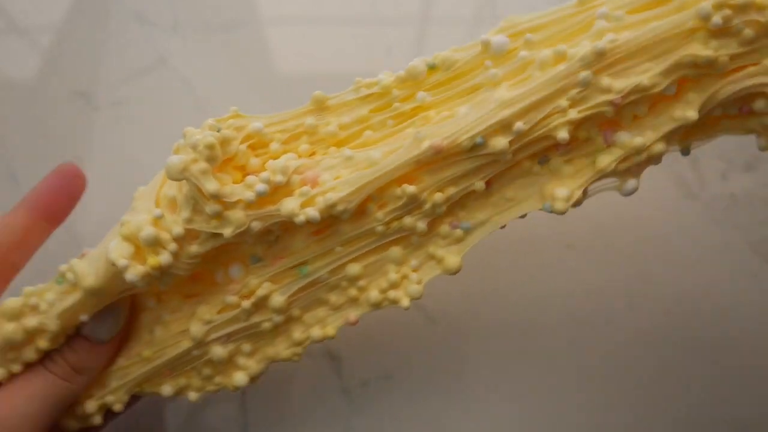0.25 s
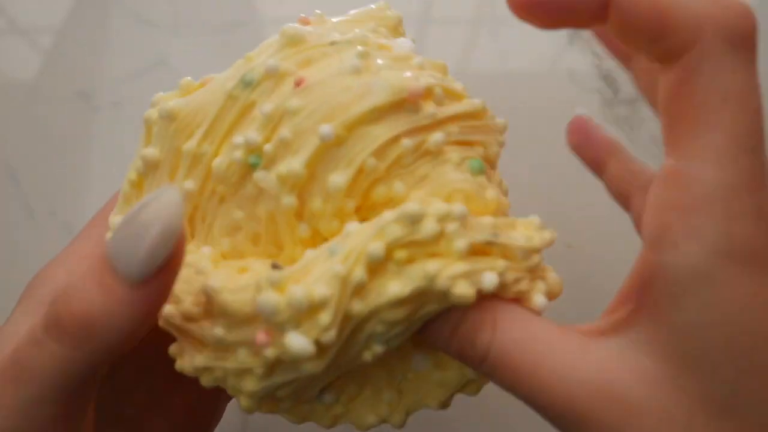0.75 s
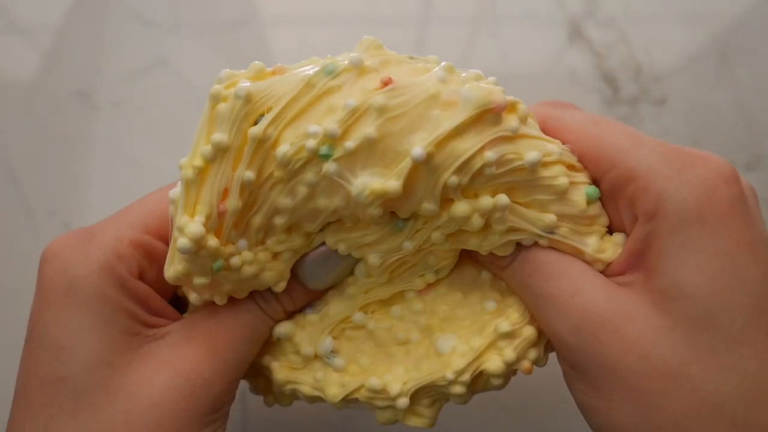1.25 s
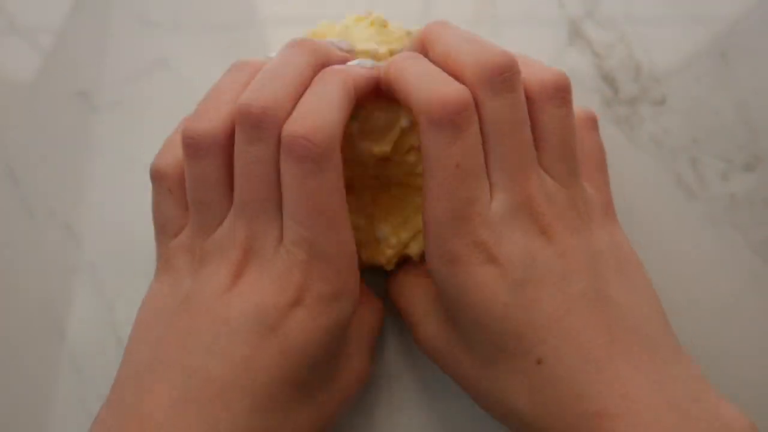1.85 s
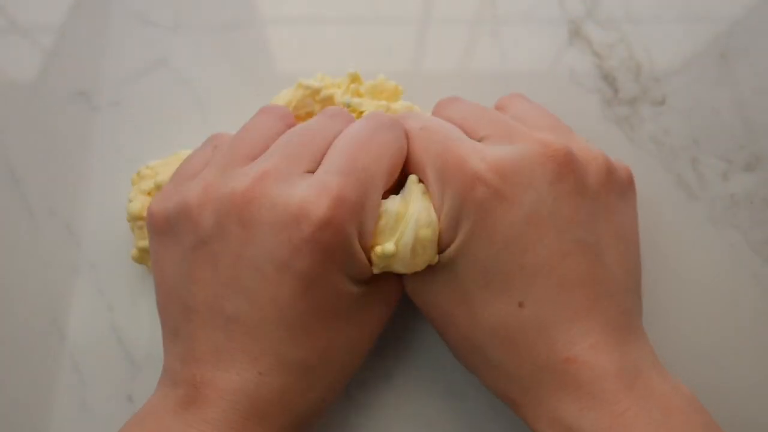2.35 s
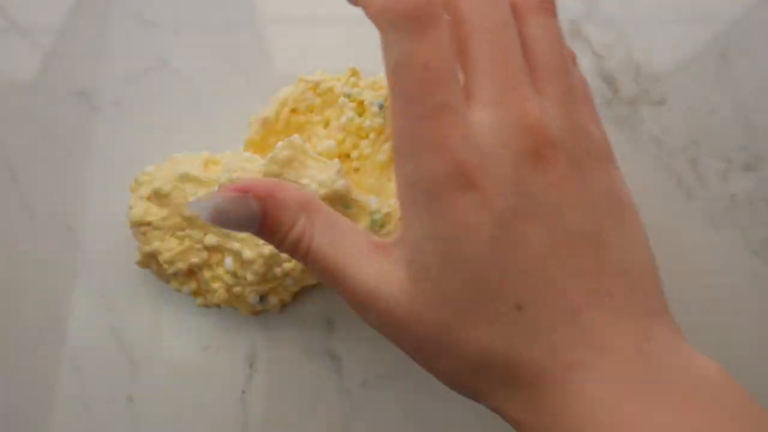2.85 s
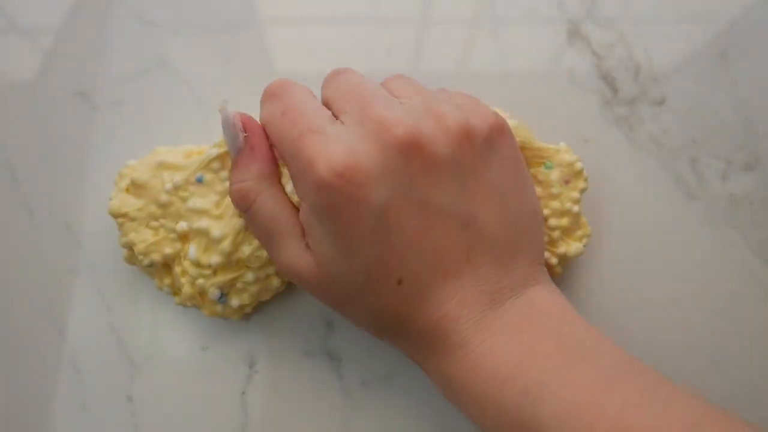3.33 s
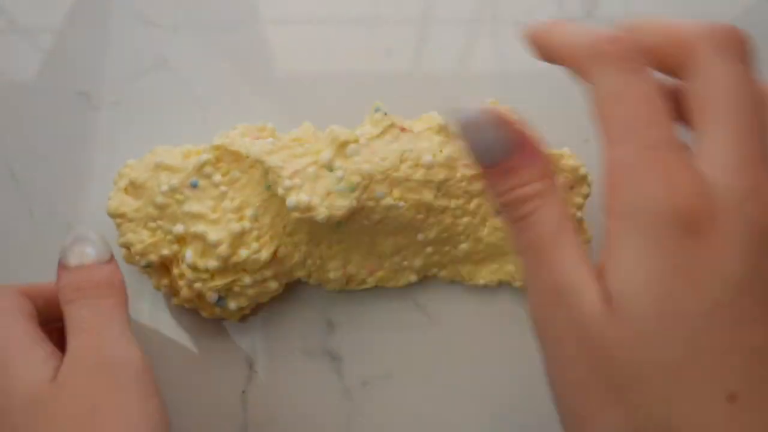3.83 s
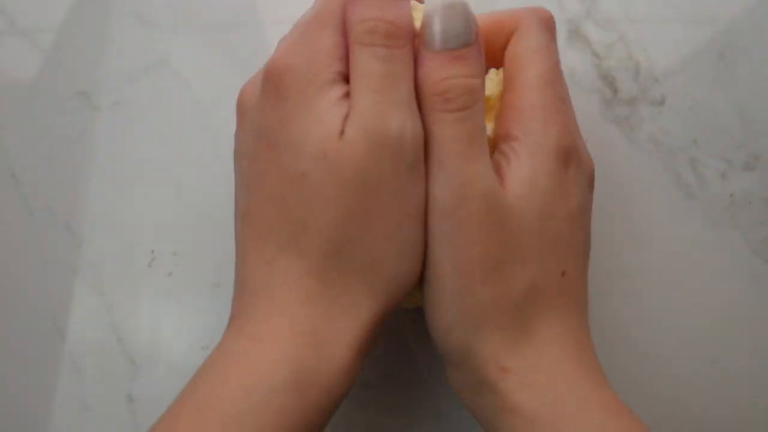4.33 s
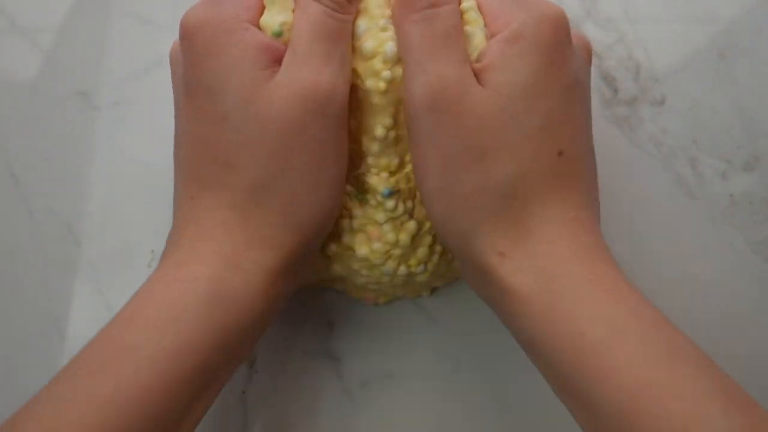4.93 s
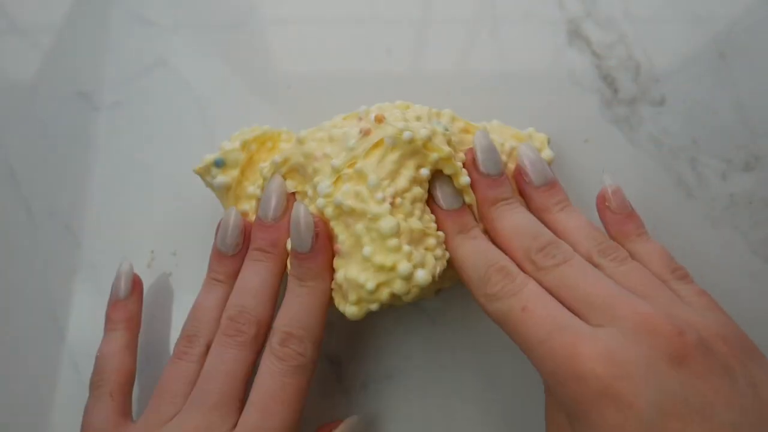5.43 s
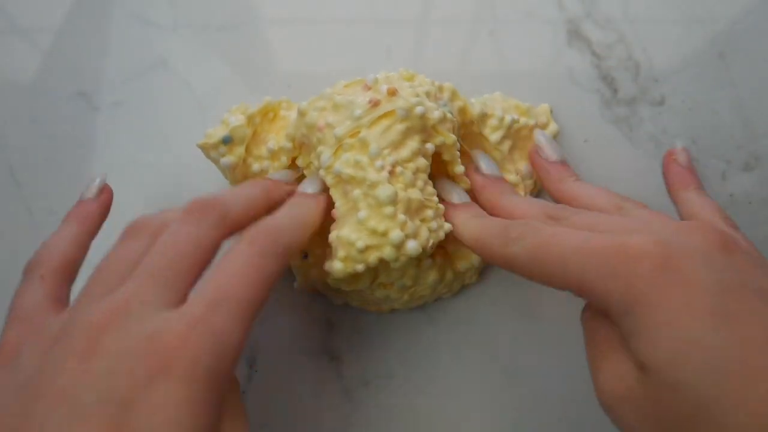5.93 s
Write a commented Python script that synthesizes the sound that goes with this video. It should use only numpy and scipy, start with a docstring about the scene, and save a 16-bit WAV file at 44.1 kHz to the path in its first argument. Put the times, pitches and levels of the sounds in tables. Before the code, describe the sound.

Hands squeeze and knead a sticky bead-filled slime, giving dense irregular crackling, sharp wet pops and faint soft thuds on a hard counter.

```python
"""Kneading bead-filled slime

Hands knead a bead-filled slime on a hard counter, close to a stereo microphone in a small bright room.
Big trapped air pockets burst as single pops: short decaying tones with a snap, a hollow and a fizz.
Countless small ones crackle with each squeeze: random grains of many pitches, gathered in flurries.
Air squirts briefly as whistling hiss; the counter booms and rings faintly, mostly as resonant noise.
A quiet room tone of coloured noise, with a low wavering hum, lies beneath; sparse echoes add the room."""
import sys
import numpy as np
from scipy import signal
from scipy.fft import rfft, irfft
from scipy.io import wavfile

SR = 44100
rng = np.random.default_rng(int(sys.argv[2]) if len(sys.argv) > 2 else 0)


def unload_wav(signal):
    """Save mono or channel-first audio to the path in sys.argv[1] as 16-bit WAV at rate SR, clipped to [-1, 1]."""
    wavfile.write(
        sys.argv[1],
        SR,
        np.round(np.clip(np.atleast_2d(signal).T, -1, 1) * 32767).astype(np.int16),
    )


N = 272538  # samples
STEP = 64  # samples between two values of a slow level curve

# single bursting pockets, before pops() trims the layers and filters out the bass:
# [t/s, level/dB, f/Hz, snap of the tearing film over the pop/dB, hollow behind the pocket over the pop/dB]
POPS = [(0.034, -23.5, 6770, -14, -18), (0.061, -27.5, 1900, -12, -28), (0.12, -21.5, 3460, 3, -11),
        (0.165, -29, 9260, -2, -15), (0.194, -27.5, 3100, 4, -27), (0.387, -25.5, 2510, -15, -31),
        (0.407, -18.5, 10600, -1, -1), (0.488, -30.5, 1810, 9.5, -29), (0.517, -33, 2270, -11, -21),
        (0.538, -25.5, 5840, -16, 0), (0.572, -20, 8300, -11, -15), (0.6, -29, 3200, -10, -10),
        (0.68, -24.5, 3830, -10, 4), (0.69, -29.5, 2650, -17, -23), (0.715, -24, 2480, 7, -15),
        (0.759, -34, 1450, 8, -20), (0.8613, -27, 2300, -6, -27), (0.925, -29.5, 1900, -30, -32),
        (0.971, -23, 1775, -13, -34), (1.031, -22.5, 2130, -23, -24), (1.063, -28.5, 2200, -15, 2),
        (1.11, -29, 2080, -5, -36), (1.123, -26.5, 3530, -10, -16), (1.155, -9.5, 6600, -2, 2.5),
        (1.201, -42, 5040, -4, -16), (1.212, -38, 2240, -15, -27), (1.227, -28.5, 7100, -6, -8),
        (1.283, -1.5, 4740, -15, -40), (1.288, -12, 3030, -23, -41), (1.322, -19.5, 3020, -17, -20),
        (1.459, -34, 2710, -27, -21), (1.551, -19, 2290, -20, -14), (1.641, -24.5, 3680, -12, -1),
        (1.862, -30, 3760, 8, -10), (1.882, -28.5, 1860, -14, -7), (1.906, -27.5, 9000, 9, -12),
        (1.921, -17.5, 10800, -4, -17), (1.949, -24.5, 2520, 12, 5), (1.977, -15.5, 1210, -24, -27),
        (2.006, -36, 5510, -12, -14), (2.012, -28.5, 4840, 17, -22), (2.07, -32, 2200, -8, -27),
        (2.08, -11.5, 7000, 3, -20), (2.088, -18.5, 1390, -18, -22), (2.1045, -11.5, 10070, 6, 4.5),
        (2.123, -18, 1490, -10, -25), (2.127, -6.5, 10600, 4.5, -6), (2.138, -13.5, 4660, -7, -7),
        (2.157, -31, 10160, -6, -17), (2.174, -8.5, 9930, 0, -5), (2.188, -9, 4180, -17, -1.5),
        (2.208, -18, 1250, -9, -9.5), (2.2202, -12, 5120, 3, -14), (2.23, -13, 5100, 2, -12),
        (2.276, 3, 11570, -4, -9), (2.308, -9, 9300, -5, -12), (2.318, 2.5, 8530, 1, -25),
        (2.333, -1.5, 9900, -1, 5), (2.349, -12, 3050, -11, -12), (2.362, -5.5, 3780, -16, -30),
        (2.379, -11, 4740, -2, -1.5), (2.405, -15.5, 6460, 6, -7), (2.413, -9, 7100, -27, -19),
        (2.448, -18, 2970, -13.5, -2), (2.463, -5.5, 2930, -30, 0), (2.61, -20.5, 1000, -8, -45),
        (2.664, -31, 920, -15, -20), (2.677, -30.5, 1150, -13, -20), (2.711, -20.5, 2190, -15, -13),
        (2.989, -29.5, 1870, -15, -10), (3.003, -16.5, 11300, -7, -16), (3.015, -9, 4080, 2.5, 0),
        (3.055, -16, 2440, -8, -0.5), (3.106, -21, 4440, -17, -14), (3.132, -15, 3710, 5, 7.5),
        (3.142, -19.5, 5900, 3, -15), (3.2, -26, 3000, 16.5, -23), (3.235, -16.5, 3980, 0, -15),
        (3.244, -8, 1840, -3, -45), (3.276, -20.5, 5640, -16, -12), (3.31, -31, 2290, -10, -20),
        (3.353, -15.5, 6420, -6, -4), (3.373, -11, 2510, -8, -14), (3.381, -26.5, 2520, -12, -27),
        (3.422, -1.5, 10530, 0.5, -26), (3.43, -30.5, 9390, -5, -20), (3.456, -1, 10530, -25, -4),
        (3.477, -8.5, 7100, 2, -16), (3.497, -16, 2470, -15, -31), (3.53, -14, 4300, -21, -1),
        (3.543, -8.5, 4000, -27, -38), (3.548, -24.5, 5540, -29, -4), (3.575, -3, 2990, -38, -34),
        (3.693, -30.5, 9200, 14, -12), (3.713, -27, 2400, -15, -3), (3.747, -24.5, 1600, -15, 6),
        (3.76, -22.5, 1690, -14, 3), (3.787, -28, 710, -15, -17), (3.795, -24.5, 1700, 4, -20),
        (3.807, -24, 1550, -15, 5), (3.82, -27.5, 645, -20, -25), (3.989, -37.5, 8960, 1, -15),
        (4.012, -29.5, 745, -10, -19), (4.074, -16, 3960, -13, -16), (4.102, -15.5, 3760, 3, -2),
        (4.158, -14, 6380, -8, -19), (4.167, -22, 3000, -9, 1), (4.236, -25, 2030, 7, 1.5),
        (4.26, -12.5, 8150, 3, -7), (4.302, -27, 1785, 8, -6), (4.335, -14.5, 10800, -22, -14),
        (4.342, -23, 2380, -14, -10), (4.366, -24, 4150, -10, -16), (4.374, -19, 9780, 0, -13),
        (4.396, -18, 5670, 1, -4), (4.445, -29.5, 2750, -18, -20), (4.467, -17, 6840, 0, -4),
        (4.487, -18, 5400, -5, -23), (4.491, -11, 12520, -16, -13), (4.529, -11, 6480, 2, -12),
        (4.564, -8, 8240, -21, -14), (4.569, -5.5, 3640, 1.5, -37), (4.596, -5.5, 6160, -24, -33),
        (4.613, -3, 6100, -16, -29), (4.623, -2.5, 6480, -21, -28), (4.633, -17, 4600, 10, -22),
        (4.685, -21.5, 11500, 6, -12), (4.705, -13.5, 6070, 8, -29), (4.724, -27, 9860, 7, -16),
        (4.755, 2.5, 12400, -38, -6), (4.758, -26, 11800, -6, -12), (4.781, -4, 11500, 2, -27),
        (4.81, -8.5, 10840, 1, -20), (4.851, -19, 10300, -5, -21), (4.866, -23, 1320, -9, -8),
        (4.882, -11.5, 10300, -3, -20), (4.894, -19, 9900, 10.5, -14), (4.982, -32.5, 6000, 7, -15),
        (5.067, -18, 10000, 2, -19), (5.101, -21, 5650, -17, -19), (5.219, -21.5, 6960, 2, -22),
        (5.287, -22, 4600, 0.5, -25), (5.302, -19, 5310, 5, -23), (5.346, -19.5, 4820, -11, -31),
        (5.435, -10.5, 11700, -41, -8), (5.497, -31.5, 3090, 7, 5), (5.523, -34, 3300, -10, -10),
        (5.542, -33, 2280, -10, -15), (5.542, -38.5, 634, -20, -25), (5.551, -41.5, 900, -15, -20),
        (5.577, -24, 4380, -18, -12), (5.611, -36, 1380, -18, 6), (5.577, -43, 900, -20, -25),
        (5.63, -20.5, 3350, 8, -5), (5.63, -35.5, 640, -20, -25), (5.659, -35.5, 695, -8, -20),
        (5.666, -30.5, 3500, -10, -8), (5.682, -15, 3710, 8.5, -6.5), (5.692, -36, 3600, -10, -10),
        (5.707, -35.5, 745, -10, -16), (5.752, -20.5, 6570, -18, -23), (5.913, -24, 5550, -11, -18),
        (5.969, -23, 6150, -13, -14), (5.978, -35.5, 545, -8, -17), (6.002, -26.5, 3640, -9, -21),
        (6.02, -35, 650, -7, -9)]
# a pop's film goes on fizzing, as added crackle: [f of the pop/Hz, fizz level over the pop/dB]
FIZZ = [(1200, -15.5), (3000, -21.5), (6000, -32), (11000, -42)]
FIZZ_FALL_DB_PER_S, FIZZ_LARGE_DB, FIZZ_TINY_DB = 257.5, -13.5, -11
# hand moves (stretch, fold, squeeze, peel), before the trim in crackle(); pitch decides how much of the
# last two columns a pocket takes: [t/s, length/s, crackle level at start/dB, crackle level at end/dB,
# weight of large pockets/dB, weight of tiny pockets/dB]
MOVES = [(0, 0.14, -39.5, -48.5, -3, 2.5), (0.163, 0.076, -45, -45.5, -5.5, -2),
         (0.252, 0.066, -57, -48, 0.5, -0.5), (0.348, 0.1, -39, -48, 2, 2),
         (0.507, 0.094, -58, -35.5, -4.5, -1.5), (0.622, 0.09, -48.5, -40.5, -4.5, 3),
         (0.781, 0.027, -35, -47.5, 6, -1.5), (0.854, 0.18, -49.5, -63.5, -9.5, -8.5),
         (1.028, .055, -35, -42, -0.5, -4), (1.107, .15, -43, -47, 3.5, 3),
         (1.352, 0.22, -48, -59.5, -1, -1.5), (1.532, 0.18, -39, -42.5, 10.5, 1),
         (1.83, 0.11, -52, -41.5, 4, 4), (1.964, 0.18, -33, -43.5, 2, 1),
         (2.068, 0.18, -35.5, -33, 6.5, 3.5), (2.271, 0.21, -26.5, -42, -6.5, 1.5),
         (2.539, 0.043, -48.5, -36.5, 12.5, -4), (2.598, .11, -32.5, -33.5, 9, 1.5),
         (3.01, 0.11, -34, -40, 1.5, 4), (3.146, 0.21, -36, -41.5, -2.5, 2.5),
         (3.247, 0.19, -27.5, -39, -7, -3), (3.422, 0.094, -31.5, -40, 1, 8),
         (3.677, 0.13, -40, -32.5, 13, 2.5), (3.822, 0.075, -48, -40, -1.5, -4.5),
         (4.034, 0.021, -27.5, -41, 4.5, 1), (4.074, 0.14, -37.5, -40, 5, 7),
         (4.251, 0.18, -49.5, -40.5, 6.5, 5), (4.482, 0.14, -41, -30.5, 1.5, 8),
         (4.664, 0.16, -38, -43, -5.5, 9), (4.809, 0.12, -47.5, -46.5, -0.5, 5),
         (4.938, 0.028, -59, -50.5, -2, 0.5), (4.995, 0.2, -41.5, -38.5, 3.5, 2.5),
         (5.188, 0.2, -44.5, -47.5, -0.5, 9), (5.439, 0.24, -47.5, -58.5, -0.5, 6),
         (5.624, .04, -45, -52.5, 6, 5.5), (5.697, 0.12, -42, -57.5, 3.5, 11.5),
         (5.915, 0.036, -46.5, -56.5, -3, 0.5), (5.946, 0.059, -47, -42, 7.5, 9)]
MOVE_RISE_DB_PER_S, MOVE_FALL_DB_PER_S = 1201, 325
# colour of the crackle, pockets of all sizes: [f/Hz, relative level/dB per Hz]
CRACKLE_COLOUR = [(150, -47), (250, 24), (358, -7), (801, -9.5), (904, -4), (1860, -3), (3320, -4),
                  (7960, -4), (10100, 0), (15000, -21)]
# large pockets vary less in strength and join the flurries less: [f/Hz, share of both effects]
CLUMPING = [(600, .45), (2000, 1.0)]

# the lump pushed against or pulled off the slab:
# [t/s, length/s, boom level/dB, drive level of the upper modes/dB]
PUSHES = [(0.098, 0.13, -70, -88), (.66, 0.081, -61, -67), (1.1, 0.082, -71, -76),
          (1.566, 0.094, -61.5, -59), (1.93, 0.088, -63, -65), (2.113, 0.056, -59, -49.5),
          (2.236, 0.26, -69, -55.5), (2.63, 0.092, -52, -47), (3.044, 0.061, -61, -53.5),
          (3.135, 0.17, -62, -53.5), (3.37, 0.21, -75, -58), (3.683, 0.15, -62, -52),
          (3.843, 0.068, -45, -56), (4.035, 0.018, -75, -50.5), (4.08, 0.11, -59.5, -52.5),
          (4.294, 0.35, -70, -59.5), (4.612, 0.26, -102.5, -57.5), (4.872, 0.081, -63, -65),
          (4.988, 0.225, -59.5, -60), (5.285, 0.078, -70, -63), (5.528, 0.25, -64.5, -61.5),
          (5.964, 0.063, -54, -52)]
BOOM_RISE_DB_PER_S, BOOM_FALL_DB_PER_S, BOOM_REST_DB = 172, 293, -81
RING_RISE_DB_PER_S, RING_FALL_DB_PER_S, RING_REST_DB = 502.5, 348, -86
BOOM_HZ, BOOM_WIDTH_HZ = 128, 28  # width of each of two filter passes
# ringing modes of the slab: [f/Hz, width of each of two filter passes/Hz, level over the drive/dB]
UPPER_MODES = [(678, 99, 0.5), (1210, 64, -10), (410, 280, -4), (263, 200, -8)]

# short hisses of squirting air, partly whistling; the two long faint rows near 5 s are the slab's modes
# ringing: [t/s, length/s, hiss level/dB, whistle or mode f/Hz, level of that pitch over the hiss/dB]
PITCHED_HISSES = [(4.016, 0.016, -21.5, 7500, -11.5), (4.033, 0.014, -33.5, 4100, 1.5),
                  (4.999, 0.125, -59.5, 700, 8), (5.085, 0.115, -59, 1260, 9),
                  (2.221, 0.02, -30.5, 4940, 5), (3.836, 0.016, -42, 4030, 2.5),
                  (5.914, 0.0081, -38.5, 2900, -11), (1.565, 0.014, -34.5, 2150, -5)]

# colour of the room tone: [f/Hz, relative level/dB per Hz]
TONE_COLOUR = [(24, -40), (40, -13.5), (143, -6), (197, -9), (280, -3.5), (397, -12.5), (496, -8.5),
               (548, -36), (606, -12.5), (797, -16), (1100, -15.5), (3000, -26), (9000, -30.5),
               (13000, -23), (15500, -39.5)]
TONE_DB = -58
HUM_HZ, HUM_WIDTH_HZ, HUM_DB = 59, 6.1, -70  # width of each filter pass; level before the channel balance

# decay of the echoes: [f/Hz, time to fall by 60 dB/s]
ROOM_DECAY = [(400, 0.026), (1500, 0.26), (4000, 0.21), (12000, 0.21)]
# colour of the microphone: [f/Hz, level/dB]
MIC_COLOUR = [(6800, 1), (7900, -2), (8800, -0.5), (14500, -9), (15400, -9.5), (15900, -23), (16600, -35.5)]
EDGE_HZ = 16600  # band limit


def gain_of(db):
    """Decibels to a factor."""
    return 10 ** (np.asarray(db) / 20)


def evened(x):
    """Scales to rms 1."""
    return x / np.sqrt(np.mean(x ** 2) + 1e-20)


def read(points, hz):
    """Reads (Hz, value) points on a log-frequency axis."""
    f, value = np.transpose(points)
    return np.interp(np.log(hz + 1), np.log(f + 1), value)


def add(mix, s, sound):
    """Mixes a two-channel sound in at second s."""
    part = mix[:, max(round(s * SR), 0):][:, :sound.shape[1]]
    part += sound[:, :part.shape[1]]


def high_passed(x, hz):
    """Takes out the bass, which tiny sources hardly stir."""
    return signal.lfilter(*signal.butter(2, hz, "high", fs=SR), x)


def swells(start, length, first_db, last_db, rise, fall):
    """Power of each move over time: a rise, a straight drift in dB while it lasts, a fall."""
    t = np.arange(0, N + STEP, STEP)[:, None] / SR
    drift_db = first_db + (last_db - first_db) * np.clip((t - start) / length, 0, 1)
    rise_db = rise * np.maximum(start - t, 0)
    fall_db = fall * np.maximum(t - start - length, 0)
    return gain_of(2 * (drift_db - rise_db - fall_db))  # doubled dB give power


def spread_out(x):
    """From one value per step to every sample."""
    return np.interp(np.arange(N), STEP * np.arange(len(x)), x)


def narrow_noise(hz, width):
    """Two partly alike channels of noise through one resonance twice, stronger on the left; rms 1."""
    a, b = rng.standard_normal((2, N))
    radius = np.exp(-np.pi * width / SR)
    poles = [1, -2 * radius * np.cos(2 * np.pi * hz / SR), radius ** 2]
    pair = np.array([a, 0.25 * a + 0.6 * b])
    once = signal.lfilter([1, 0, -1], poles, pair)
    return evened(signal.lfilter([1], poles, once))


def burst(hz, cycles, glide, onset=2.78):
    """Air in an opened pocket swings a few times, its pitch first rising as the hole widens; peak 1."""
    turns = np.arange(600) / SR * min(hz, SR / 3)
    fade = turns / max(cycles, 0.3)
    swing = np.sin(2 * np.pi * turns * (1 + glide * np.minimum(fade, 2)))
    wave = swing * np.exp(-fade) * (1 - np.exp(-onset * turns)) ** 2
    return wave / abs(wave).max()


def room_tone():
    """Steady coloured noise, nearly unrelated left and right, and a wavering hum."""
    hz = np.fft.rfftfreq(N, 1 / SR)
    a, b = rng.standard_normal((2, N))
    noise = irfft(rfft(np.array([a, 0.029 * a + b])) * gain_of(read(TONE_COLOUR, hz)), N)
    steady = np.sin(2 * np.pi * HUM_HZ * np.arange(N) / SR) * gain_of([[4], [0]])  # stronger on the left
    hum = steady + 0.56 * narrow_noise(HUM_HZ, HUM_WIDTH_HZ)
    return gain_of(TONE_DB) * evened(noise) + gain_of(HUM_DB) * hum


def kneading():
    """Crackle level and the weights of large and tiny pockets, from all moves and the fizz after each pop."""
    start, length, first_db, last_db, large_db, tiny_db = np.transpose(MOVES)
    moves = swells(start, length, first_db, last_db, MOVE_RISE_DB_PER_S, MOVE_FALL_DB_PER_S)
    s, db, hz = np.transpose(POPS)[:3]
    fizz_db = db + read(FIZZ, hz)
    fizz = swells(s, 0.0023, fizz_db, fizz_db, 5000, FIZZ_FALL_DB_PER_S).sum(1)
    power = moves.sum(1) + fizz + 1e-9
    large = (moves @ large_db + fizz * FIZZ_LARGE_DB) / power
    tiny = (moves @ tiny_db + fizz * FIZZ_TINY_DB) / power
    return spread_out(10 * np.log10(power)), spread_out(large), spread_out(tiny)


def flurry_gain(level_db, large_db):
    """One burst sets off its neighbours: flurries that start at once and die away; rms 1."""
    starts = gain_of(2.5 * np.minimum(rng.exponential(1, N), 2.2)) * (rng.random(N) < 25 / SR)
    pop_s, pop_db = np.transpose(POPS)[:2]
    at = (pop_s * SR).astype(int)
    starts[at] += gain_of(0.15 * (pop_db - level_db[at]))  # the bigger the pop, the bigger its flurry
    flurries = signal.lfilter([1], [1, -np.exp(-1 / (0.0073 * SR))], starts)  # 7.3 ms decay constant
    return evened(1.04 + flurries * gain_of(-0.4 * large_db))  # wet, soft folds crackle more evenly


def crackle(per_s=300, spread_db=3.7, count=30):
    """Pockets of many sizes burst at random in clumps; a few are much louder than the rest."""
    level_db, large_db, tiny_db = kneading()
    clumps = flurry_gain(level_db, large_db)
    spots, clump_power = np.zeros((3, 2, N)), np.mean(clumps ** 2)
    for k, hz in enumerate(np.geomspace(350, 13500, count)):
        share = read(CLUMPING, hz)
        strength = gain_of(spread_db * share * np.minimum(rng.exponential(1, N), 2.8))
        sizes = strength * rng.choice([-1, 1], N)
        sizes *= rng.random(N) < per_s * (hz / 3000) ** 0.3 / SR  # small pockets are more numerous
        place_db = 8 * rng.uniform(-0.98, 1, N)  # left over right
        train = sizes * gain_of([place_db / 2, -place_db / 2])
        grains = evened(signal.oaconvolve(train, burst(hz, 1.27, 0.1)[None], axes=1)[:, :N])
        size_db = large_db * read([(900, 0.66), (2500, 0.04)], hz)
        size_db += tiny_db * read([(4500, 0.22), (9000, 1.0)], hz)
        colour = np.sqrt(hz) * gain_of(read(CRACKLE_COLOUR, hz) + size_db)  # higher bands are wider
        spots[k % len(spots)] += grains * colour * clumps ** share
    return evened(spots) * np.sqrt(clump_power) * gain_of(level_db - 4)


def pops(count=3):
    """Each pocket rings at its own pitch, with a bright snap and a lower hollow; they burst at a few spots."""
    spots, chance = np.zeros((count, 2, N)), rng.random((len(POPS), 4))
    for k, (s, db, hz, snap_db, hollow_db) in enumerate(POPS):
        sign, glide, snap, place = chance[k]
        # the smallest pockets ring for the most cycles
        cycles = read([(700, 0.65), (2000, 0.92), (5000, 0.67), (10000, 2.13)], hz)
        wave = burst(hz, cycles, 0.03 * glide, onset=5)
        wave += gain_of(snap_db - 2.5) * burst(9500 + 2500 * snap, 2.0, 0)
        wave += gain_of(snap_db - 10.0) * burst(5800, 0.67, 0, onset=5.2)  # lower part of the snap
        wave += gain_of(hollow_db - 11.0) * burst(0.47 * hz, 1.0, 0, onset=5.5)
        wave += gain_of(-27.0) * burst(1180, 0.99, 0)  # faint knock of fixed pitch
        wave += gain_of(-34) * burst(710, 1.6, 0, onset=4.2)  # the lump thuds along
        edge_db = read([(2500, -7), (6000, -24)], hz)
        wave += gain_of(edge_db) * burst(1.9 * hz, 0.5, 0, onset=9)  # the sharp edge of the burst
        pan_db = read([(4000, 1.5), (11000, 7.7)], hz) * (place - 0.5)  # high pops spread wider
        pan = gain_of([[pan_db / 2], [-pan_db / 2]])
        add(spots[k % count], s, np.sign(sign - 0.5) * gain_of(db) * wave * pan)
    return high_passed(spots, 280)


def counter():
    """The slab's modes, stirred by the hands and the peeling slime."""
    start, length, boom_db, ring_db = np.transpose(PUSHES)
    boom_power = swells(start, length, boom_db, boom_db, BOOM_RISE_DB_PER_S, BOOM_FALL_DB_PER_S).sum(1)
    ring_power = swells(start, length, ring_db, ring_db, RING_RISE_DB_PER_S, RING_FALL_DB_PER_S).sum(1)
    boom = np.sqrt(boom_power + gain_of(2 * BOOM_REST_DB))
    ring = np.sqrt(ring_power + gain_of(2 * RING_REST_DB))
    modes = sum(gain_of(db) * narrow_noise(hz, width) for hz, width, db in UPPER_MODES)
    return narrow_noise(BOOM_HZ, BOOM_WIDTH_HZ) * spread_out(boom) + modes * spread_out(ring)


def pitched_hisses():
    """Hiss with one resonant pitch: short whistling air squirts, and two longer faint rings of the slab."""
    mix = np.zeros((2, N))
    for s, length, db, hz, pitch_db in PITCHED_HISSES:
        noise = rng.standard_normal(round(length * SR))
        pitch = signal.lfilter(*signal.iirpeak(hz, 13.0 + hz / 1500, fs=SR), noise)
        hiss = np.diff(noise, prepend=0) + noise  # brightened
        sound = evened(hiss) + gain_of(pitch_db) * evened(pitch)
        shape = signal.windows.tukey(len(sound), 0.2)
        add(mix, s, gain_of(db) * sound * shape * np.ones((2, 1)))
    return mix


def room(x):
    """Sparse echoes of random sign, strongest from nearby surfaces, each band dying at its own speed."""
    length = SR // 2
    slots = np.arange(12, length - 24, 24)
    taps = np.zeros((3, length))
    at = slots + rng.integers(0, 24, (3, len(slots)))  # one echo in every 24 samples
    np.put_along_axis(taps, at, rng.choice([-1., 1.], at.shape), 1)
    taps = taps[0] + 0.58 * taps[1:]  # both capsules share the stronger echoes
    taps *= 1 + 2.6 * np.exp(-np.arange(length) / SR / 0.004)  # early echoes stand out
    hz, t, z = signal.stft(taps, SR, nperseg=128)
    decay = gain_of(-60 * t / read(ROOM_DECAY, hz)[:, None])
    tail = high_passed(signal.istft(z * decay, SR, nperseg=128)[1], 350)
    return signal.fftconvolve(x, tail / np.linalg.norm(tail[0]), axes=1)[:, :N]


def scene():
    """Pops, crackle and hisses with echoes that differ from spot to spot, over counter and room tone."""
    single, dense = pops(), crackle()
    dense[0] += pitched_hisses()
    sends = gain_of(-4) * single + gain_of(-5.5) * dense
    wet = sum(room(spot) for spot in sends)
    return (single + dense).sum(0) + wet + counter() + room_tone()


def record(dry):
    """Microphone colour, clipping at full scale, then the band limit."""
    hz = np.fft.rfftfreq(N, 1 / SR)
    coloured = irfft(rfft(dry) * gain_of(read(MIC_COLOUR, hz)), N)
    edge = signal.firwin(511, EDGE_HZ, window=("kaiser", 9), fs=SR)
    return signal.oaconvolve(np.clip(coloured, -1, 1), edge[None], "same", axes=1)


dry = scene()
out = record(dry)
unload_wav(out)
```